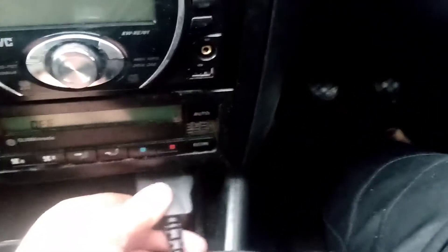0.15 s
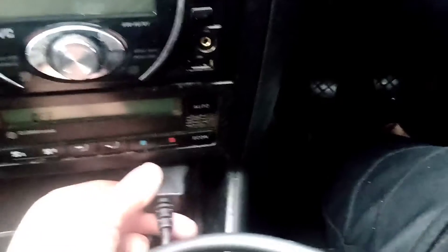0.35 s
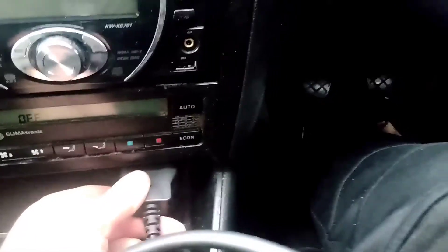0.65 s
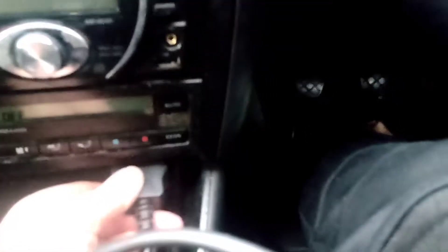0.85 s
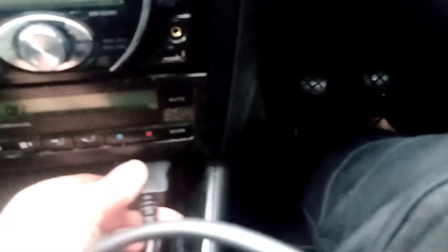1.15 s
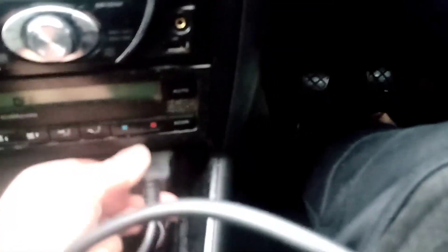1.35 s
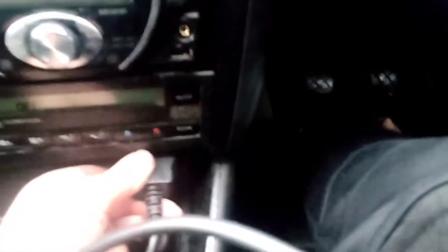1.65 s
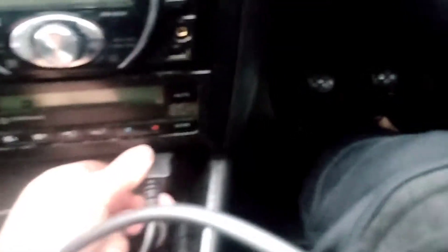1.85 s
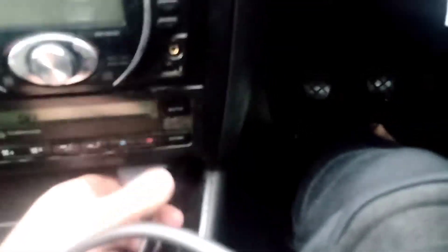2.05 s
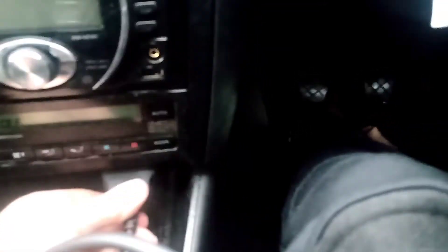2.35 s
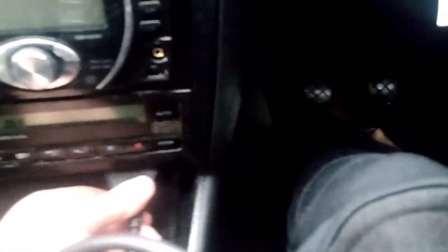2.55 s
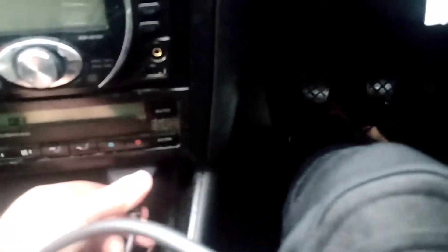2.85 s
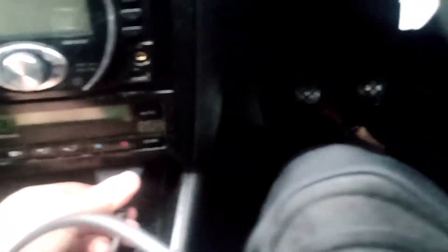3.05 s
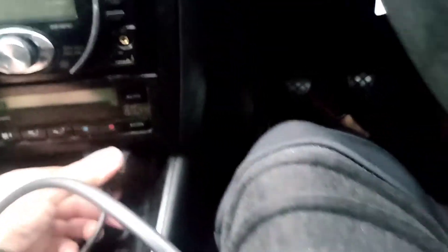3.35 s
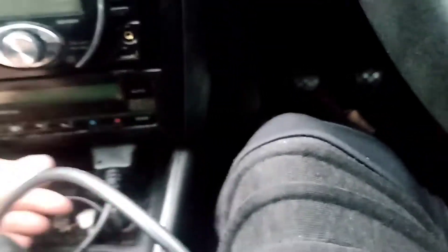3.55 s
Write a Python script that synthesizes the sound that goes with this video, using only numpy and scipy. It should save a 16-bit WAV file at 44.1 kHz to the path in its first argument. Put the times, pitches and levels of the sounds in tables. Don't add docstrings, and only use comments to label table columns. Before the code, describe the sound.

Plastic plug clicks and scrapes against a socket, creaking and ratcheting home inside a quiet car.

```python
import sys
import numpy as np
from scipy import signal
from scipy.fft import rfft, irfft, next_fast_len
from scipy.io import wavfile
from scipy.ndimage import uniform_filter1d

SR = 44100
rng = np.random.default_rng(int(sys.argv[2]) if len(sys.argv) > 2 else 0)


def volts(x):
    e = np.asarray(x, float) / 20
    return 10 ** e


def transcribe(signal):
    frames = np.atleast_2d(signal).T
    limited = np.clip(frames, -1, 1)
    pcm = np.round(limited * 32767).astype(np.int16)
    wavfile.write(sys.argv[1], SR, pcm)


N = 163170
BANDS = 30 * 2 ** np.arange(0, 9.6, .5)
SEATING_BELOW_HZ = 1000

# frequency in [Hz], level in [dB], decay time t60 in [s].
SHELL_MODES = [(262.6, -11.5, 0.093), (375, -18.5, 0.031), (571, -8.5, 0.061), (683.5, -3, 0.067),
               (819.6, 5, 0.03), (1183, -2, 0.047), (1714, -10.5, 0.083), (1874, -13, 0.016),
               (2280, -4.5, 0.054), (2800, 5.5, 0.0073), (3790, -30.5, 0.09)]
# frequency in [Hz], density in [dB per Hz].
CRACK_COLOUR = [(60, -18.5), (480, -4.5), (803, -3), (1060, -16), (1700, -8), (4320, -20.5), (7230, -17),
                (11000, -22.5), (16000, -26)]


def rms_one(x):
    return x / np.sqrt(np.mean(x ** 2) + 1e-20)


def at_hz(points, hz):
    points = np.array(points)
    return np.interp(np.log(hz), np.log(np.maximum(points[:, 0], 1)), points[:, 1])


def drift(rate):
    r = np.exp(-80 * np.pi * rate / SR)
    slow = signal.lfilter([1], [1, -2 * r, r * r], rng.standard_normal(N // 40 + 2002))
    slow = slow[2000:]
    return np.interp(np.arange(N) / 40, np.arange(len(slow)), rms_one(slow))


def ring(clicks, hz, t60):
    r, w = volts(-60 / (t60 * SR)), 2 * np.pi * hz / SR
    return signal.lfilter([0, np.sin(w)], [1, -2 * r * np.cos(w), r * r], clicks + 1e-18)


def die_away(x, t60):
    return signal.lfilter([1], [1, -volts(-60 / (t60 * SR))], x + 1e-18)


def band(x, low, high):
    sos = signal.butter(2, [low, min(high, .45 * SR)], "band", fs=SR, output="sos")
    return signal.sosfilt(sos, x)


def band_around(x, hz, width_hz):
    return rms_one(band(x, hz - width_hz / 2, hz + width_hz / 2))


def train(s, gains):
    return np.bincount((s * SR).astype(int), gains, N)[:N]


def banded_noise(spectrum, likeness, size):
    flicker_db = 1.2
    out, white, together = 0, rng.standard_normal((2, 2, size)), drift(5.3)
    for k, (low, high) in enumerate(zip(BANDS, BANDS[1:])):
        mid, side = band(white[k % 2], low, high)
        hz = np.sqrt(low * high)
        alike = np.clip(at_hz(likeness, hz), -1, 1)
        wander = (0.49 * together + drift(5.1))[:size]
        gain = volts(at_hz(spectrum, hz) + flicker_db * wander)
        out = out + gain * (np.sqrt(1 + alike) * mid + np.sqrt(1 - alike) * side * [[1], [-1]])
    return rms_one(out)


def brightening(hz):
    return np.clip(np.log2(hz / 3110) + .5, 0, 1)


def paired(two, hz):
    # frequency in [Hz], left-right likeness from 0 to 1 [no unit].
    crack_likeness = [(500, .93), (1300, .4), (9000, .7)]
    alike = np.clip(at_hz(crack_likeness, hz), 0, 1)
    return np.sqrt(.5 + alike / 2) * two[0] + np.sqrt(.5 - alike / 2) * two[1] * [[1], [-1]]


def evened(x):
    power = uniform_filter1d(np.mean(np.atleast_2d(x) ** 2, axis=0), size=1300)
    return x / np.sqrt(power.clip(1e-12))


def cabin_floor(held_db):
    # frequency in [Hz], density in [dB per Hz].
    floor_colour = [(18, -32), (30, -5.5), (59, 2), (93, -13.5), (134, -5.5), (1350, -27), (6550, -32),
                    (7670, -30), (16000, -40)]
    # frequency in [Hz], left-right likeness from 0 to 1 [no unit].
    floor_likeness = [(60, 0.96), (240, 0.79), (950, 0.097), (3770, 0.01), (15000, 1)]
    gate_opens_db, gate_slope, gate_range_db = -67, 0.45, 11.5
    opening_db = np.clip(gate_slope * (held_db - gate_opens_db), 0, gate_range_db)
    opening_db = np.roll(uniform_filter1d(opening_db, size=200), shift=200)
    hum = band_around(rng.standard_normal(N + SR), 48.2, 5.1)[SR:]
    boom = band_around(rng.standard_normal(N), 277, 64)
    rumble = banded_noise(floor_colour, floor_likeness, size=N)
    return volts(opening_db) * (volts(-69.5) * rumble + volts(-74) * hum + volts(-75.5) * boom)


def pressure():
    # start in [s], length in [s], level in [dB], rise over the length in [dB].
    strokes = [(0.318, 0.055, -48, -4), (0.372, 0.027, -45, 18), (0.756, 0.043, -53, -19.5),
               (0.918, 0.057, -62.5, -4.5), (1.057, 0.062, -48, 18), (1.26, 0.036, -54, 1.5),
               (1.335, 0.065, -42.5, 4), (1.451, 0.059, -59.5, -8), (1.597, 0.073, -52.5, -2),
               (1.654, 0.067, -49, -3), (1.818, 0.044, -45.5, -3), (1.907, 0.12, -42, 5),
               (2.025, 0.062, -49, 5), (2.37, 0.1, -46.5, 4.5), (2.516, 0.01, -63, -14),
               (2.533, 0.1017, -45.5, 17.5), (2.682, 0.048, -57.5, 14), (2.94, 0.11, -50, 12),
               (3.057, 0.25, -44.5, 1.5), (-.01, 0.032, -64.5, 16), (2.199, .16, -71.5, 5),
               (1.507, .09, -67, -5), (0.551, 0.034, -58.5, -10), (0.835, 0.045, -58, 2)]
    edge_s = .003
    t, out = np.arange(N) / SR, np.zeros(N)
    for s, length, db, rise_db in strokes:
        edge = np.clip(np.minimum(t - s, s + length - t) / edge_s + .5, 0, 1)
        out += edge * volts(db + rise_db * np.clip((t - s) / length - .5, -.5, .5))
    return out


def shove(push):
    thud_hz, thud_db, lag_s = 68, -30.5, 0.017
    mid, side = rms_one(band(rng.standard_normal((2, N)), 29.0, thud_hz * 2))
    rumble = mid + 0.28 * side * [[1], [-1]]
    weight = uniform_filter1d(push, size=900).clip(0) ** 0.65
    return volts(thud_db) * rumble * np.roll(weight, int(lag_s * SR))


def creak():
    slips_per_s, bright_db, modes_db = 1900, -2.5, 2
    ringing_share, grit_hiss = 0.23, .8
    slips = volts(3.2 * np.minimum(rng.exponential(1, N), 4)) * rng.choice([-1, 1], N)
    slips *= rng.random(N) < slips_per_s * volts(3 * drift(40)) / SR
    push = pressure()

    firm = slips * (rng.random(N) < ringing_share)
    dealt = rng.integers(0, 3, N)
    modes = 0
    for k, (hz, db, t60) in enumerate(SHELL_MODES):
        modes = modes + volts(db) * ring(firm * (dealt != k % 3), hz, t60)

    grit = slips + grit_hiss * rng.standard_normal((2, N)) * volts(2 * drift(29)) * np.std(slips)
    crackle = 0
    for k, (low, high) in enumerate(zip(BANDS[4::2], BANDS[6::2])):
        hz = low * np.sqrt(2)
        gain = volts(at_hz(CRACK_COLOUR, hz) + bright_db * brightening(hz))
        crackle = crackle + gain * paired(band(grit, low, high), low) * (-1) ** k
    return push * (volts(modes_db) * evened(modes) + evened(crackle)) / 2 + shove(push)


def pings():
    # start in [s], peak in [dB], pitch in [Hz].
    tiny_ticks = [(.357, -41, 3830), (.501, -56, 9000), (.519, -60, 12000), (0.557, -56, 11400),
                  (.573, -53, 12000), (.695, -58, 4080), (.705, -65, 9000), (0.9, -55, 8700),
                  (0.926, -54.5, 3360), (.926, -51.5, 780), (1.291, -55, 10000), (1.4, -36, 12000),
                  (1.436, -51, 3400), (1.485, -53, 9700), (1.531, -58, 10500), (1.582, -52.5, 12000),
                  (1.59, -48.5, 12500), (1.64, -54, 13000), (1.726, -41, 9300), (1.758, -56, 11000),
                  (2.06, -44, 10000), (1.673, -34, 2610), (2.418, -61, 9000), (.408, -56, 12000),
                  (0.0037, -59.5, 584), (1.39, -40, 258), (3.519, -51.5, 607), (3.358, -53, 608),
                  (2.737, -55.5, 587), (1.464, -51, 580)]
    cycles, spread = 29, 0.37
    out, draw = np.zeros(N), rng.standard_normal((len(tiny_ticks), 3))
    t = np.arange(int(.08 * SR)) / SR
    for (s, db, hz), detune in zip(tiny_ticks, draw):
        partials = hz * (1 + spread * min(hz / 10000, 1) ** 2 * detune[:, None] / 2)
        tones = np.sin(2 * np.pi * np.minimum(partials, 15500) * t).sum(axis=0)
        start = int(s * SR)
        out[start:start + len(t)] += volts(db - 60 * t * hz / cycles) * tones
    return out


def shell_ring(s, db, bright_db, seated_db, draw):
    modes_db, scatter_db, grip_detune = -16.5, 3.5, .035
    second_s = s + 0.001994 + 0.00055 * draw[:, -1]
    third_s = s + .005 + 0.00088 * draw[:, -3]
    out = 0
    for k, (hz, mode_db, t60) in enumerate(SHELL_MODES):
        gain_db = db + modes_db + mode_db + scatter_db * draw[:, k]
        gain = volts(gain_db + bright_db * brightening(hz) + seated_db * (hz < SEATING_BELOW_HZ))
        grip = np.clip(np.round(draw[:, 30 + k]), -1, 1)
        for bend in (-1, 0, 1):
            held = gain * (grip == bend)
            hits = train(s + 0.00052, held) + train(second_s, -.6 * held)
            hits = hits + train(third_s, 0.89 * held * draw[:, k + 1])
            out = out + ring(hits, hz * (1 + grip_detune * bend), t60)
    return out


def shell_crack(s, db, bright_db, seated_db, draw):
    # frequency in [Hz], decay time t60 in [s].
    crack_t60 = [(150, 0.14), (800, 0.04), (3000, 0.087), (12000, 0.039)]
    crack_db, scatter_db = -13, 3
    snap_t60_s, snap_db, snap_tilt_db = 0.011, -1.5, -2
    out, white = np.zeros((2, N)), rng.standard_normal((2, 2, N))
    for k, (low, high) in enumerate(zip(BANDS[3:], BANDS[4:])):
        hz = np.sqrt(low * high)
        gain_db = db + crack_db + at_hz(CRACK_COLOUR, hz) + scatter_db * draw[:, len(SHELL_MODES) + k]
        gain = volts(gain_db + bright_db * brightening(hz) + seated_db * (hz < SEATING_BELOW_HZ))
        hits = train(s, gain)
        snap = volts(snap_db + snap_tilt_db * brightening(hz / 2)) * hits
        dying = die_away(hits, at_hz(crack_t60, hz)) + die_away(snap, snap_t60_s)
        dying = signal.lfilter([.04], [1, -.96], dying)
        out += 8 * paired(band(white[k % 2] * dying, low, high), hz)
    return out


def ticks():
    # start in [s], peak in [dB], brightness in [dB].
    wiggles = [(0.203, -59, -1.5), (0.32, -24, -16.5), (0.356, -25.5, -16), (0.3813, -24.5, -19),
               (0.3975, -30.5, -23), (0.438, -33.5, -23), (0.547, -37, -31), (0.749, -32.5, -17.5),
               (0.845, -34, -26.5), (0.923, -48, -32), (1.017, -54, -36), (1.063, -26, -18.5),
               (1.104, -29, -23.5), (1.154, -49, -23), (1.274, -32.5, -27), (1.337, -31.5, -12.5),
               (1.363, -27.5, -8), (1.436, -51.5, 2.5), (1.463, -41.5, -23), (1.531, -51.5, -13),
               (1.6, -41, -17), (1.638, -41, -11), (1.653, -27, -14.5), (1.662, -32, -12.5),
               (1.672, -20.5, -21.5), (1.687, -32, -24), (1.695, -35, -20), (1.703, -29.5, -18.5),
               (1.71, -36, -16), (1.718, -50, -3)]
    # start in [s], peak in [dB], brightness in [dB].
    pushes = [(1.82, -43, -6), (1.829, -32.5, -17), (1.908, -46, -9), (1.938, -28, -22.5),
              (1.966, -29, -37), (1.986, -25, -21.5), (2.004, -30, -31), (2.025, -27.5, -38),
              (2.056, -27, -23), (2.065, -24, -16), (2.373, -44, -17), (2.385, -31.5, -25.5),
              (2.414, -34, -36), (2.43, -32, -20.5), (2.439, -35.5, -35), (2.455, -29, -35),
              (2.473, -24.5, -19.5), (2.481, -34, -25), (2.509, -29.5, -24.5), (2.54, -33.5, -32),
              (2.552, -25, -14.5), (2.591, -28.5, -21), (2.607, -27, -16), (2.62, -27, -40),
              (2.676, -43, -18.5), (2.7, -46, -24), (2.737, -40.5, -20)]
    # start in [s], peak in [dB], brightness in [dB].
    slide = [(2.928, -47.5, -26), (2.943, -45, -37), (2.976, -30, -22), (3.0, -26, -30),
             (3.059, -29.5, -15), (3.066, -33, -11.5), (3.101, -29, -11.5), (3.109, -34, -17),
             (3.14, -33.5, -12), (3.143, -26.5, -17.5), (3.179, -28.5, -12), (3.186, -23.5, -21),
             (3.217, -31.5, -15.5), (3.221, -21, -26.5), (3.257, -29.5, -21), (3.26, -25, -20.5),
             (3.288, -28.5, -12.5), (3.293, -30.5, -21), (3.36, -50, -37), (3.522, -38.5, -20),
             (3.681, -46, -7)]
    # time in [s], weight of the low modes in [dB].
    seating = [
        (.3, -6.5),
        (.4, 0),
        (.8, -4.5),
        (1.1, -1.5),
        (1.4, 0),
        (1.7, 0.5),
        (2, 1),
        (2.5, 0.5),
        (3, 1),
        (3.3, -3),
    ]
    s, db, bright_db = np.transpose(wiggles + pushes + slide)
    bright_db = bright_db + 15.5
    seated_db = np.interp(s, *np.transpose(seating))
    draw = rng.standard_normal((len(s), 50))
    ringing = shell_ring(s, db, bright_db, seated_db, draw)
    return ringing + shell_crack(s, db, bright_db, seated_db, draw)


def cloth():
    # time in [s], level in [dB].
    slide_level = [
        (3.32, -60),
        (3.342, -55.5),
        (3.7, -49.5),
    ]
    # frequency in [Hz],
    # density in [dB per Hz].
    closing_colour = [(24, -33), (40, 12), (194, -6), (290, -2.5), (1520, -5.5), (2050, 1), (5310, -13),
                      (7730, -14), (16000, -19)]
    s, db = np.transpose(slide_level)
    hiss = banded_noise(closing_colour, [(100, 0.99), (1500, 0.04), (9000, 0.98)], size=SR)
    ringing = band_around(hiss, 1860, 570)
    rub_db = np.interp(np.arange(N - SR, N) / SR, [s[0] - .6, *s], [-88, *db])
    rub = volts(rub_db) * rms_one(hiss + volts(-10.5) * ringing)
    return np.pad(rub, [(0, 0), (N - SR, 0)])


def cabin(x):
    t60_s, low_hz, cut_hz, level = 0.033, 298, 5100, volts(-13)
    t = np.arange(int(.2 * SR)) / SR
    tail = rng.standard_normal((2, len(t))) * volts(-60 * t / t60_s) * (t > .002)
    tail = signal.sosfilt(signal.butter(1, [low_hz, cut_hz], "band", fs=SR, output="sos"), tail)
    tail = tail / np.sqrt(np.sum(tail ** 2) / 2)
    return level * signal.fftconvolve(x, tail, axes=1)[:, :N]


def ports(x):
    # frequency in [Hz], left minus right in [dB], extra left lag in [rad].
    port_balance = [(330, -.5, 0), (600, -1.5, .6), (1000, 1, .4), (2500, 4, -1.6), (5500, 1.5, 0),
                    (8000, -6, 0), (14000, -3.5, 0)]
    left_lag_s = .00019
    size = next_fast_len(N + SR)
    hz = np.arange(size // 2 + 1) * SR / size + 1
    turn = np.pi * hz * left_lag_s + at_hz(np.array(port_balance)[:, ::2], hz) / 2
    half = volts(at_hz(port_balance, hz) / 2) * np.exp(-1j * turn)
    return irfft(rfft(x, size) * np.array([half, 1 / half]), size)[:, :N]


def suppressor_level_db(x):
    closes_db_per_s = 471
    db = 10 * np.log10(uniform_filter1d(np.mean(x ** 2, axis=0), size=200).clip(1e-12))
    fall = closes_db_per_s * np.arange(N) / SR
    return np.maximum.accumulate(db + fall) - fall


def dropouts(x):
    # start in [s], length in [s], depth in [dB].
    mutes = [
        (.339, .006, -20),
        (.412, .024, -7),
        (.525, .006, -16),
        (.735, .007, -16),
        (1.803, .006, -20),
        (2.361, .009, -16),
        (2.545, .003, -12),
    ]
    t, db = np.arange(N) / SR, np.zeros(N)
    for s, length, depth_db in mutes:
        db += depth_db * ((t > s) & (t < s + length))
    treble = signal.sosfiltfilt(signal.butter(2, 1200, "high", fs=SR, output="sos"), x)
    return x - treble * (1 - volts(uniform_filter1d(db, size=60)))


def microphone(x):
    x = signal.sosfilt(signal.butter(4, 46.2, "high", fs=SR, output="sos"), x)
    x = x + 0.65 * signal.lfilter(*signal.iirpeak(7670, 4, fs=SR), x)
    return signal.sosfilt(signal.cheby2(10, 20, 16050, fs=SR, output="sos"), x)


def scene():
    tails_below_db, tails_slope, tails_range_db = -53, .7, 7
    plug = creak() + pings() + ticks()
    heard = ports(plug + cabin(plug))
    rub = cloth()
    held_db = suppressor_level_db(heard + rub)
    cut_db = np.clip(tails_slope * (held_db - tails_below_db), -tails_range_db, 0)
    return dropouts(heard * volts(cut_db) + rub + cabin_floor(held_db))


def band_limit(x):
    return signal.sosfilt(signal.butter(12, 16830, fs=SR, output="sos"), x)


def record(dry):
    mix = microphone(dry)
    return band_limit(mix)


dry = scene()
out = record(dry)
transcribe(out)
```